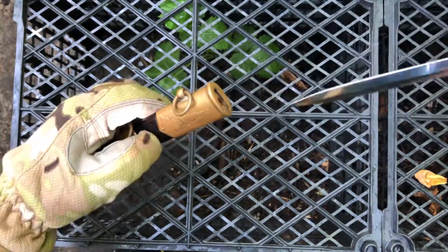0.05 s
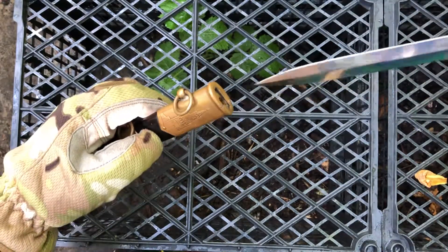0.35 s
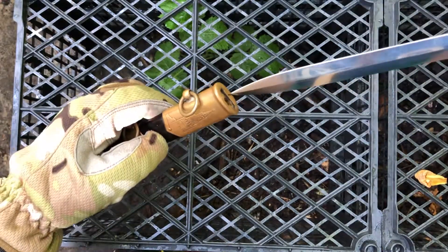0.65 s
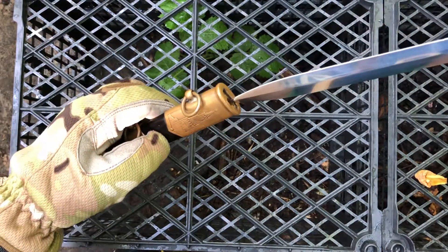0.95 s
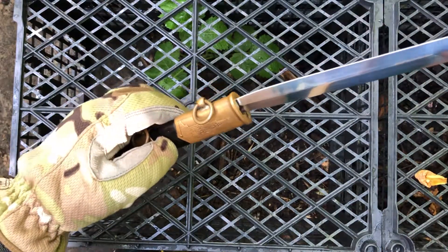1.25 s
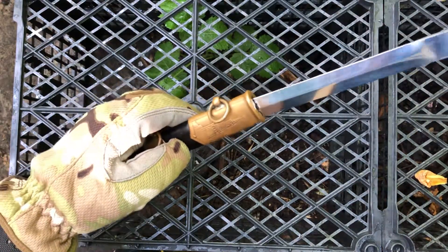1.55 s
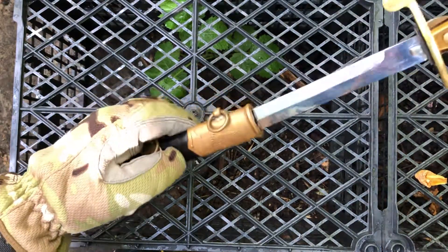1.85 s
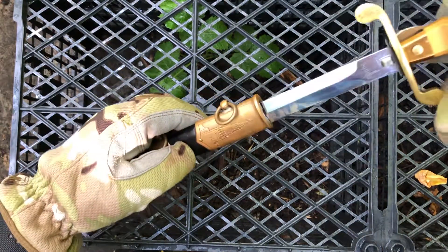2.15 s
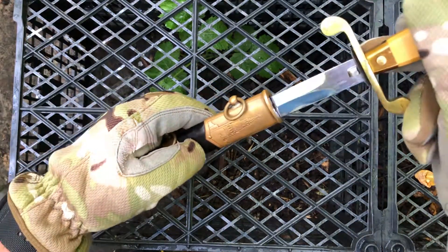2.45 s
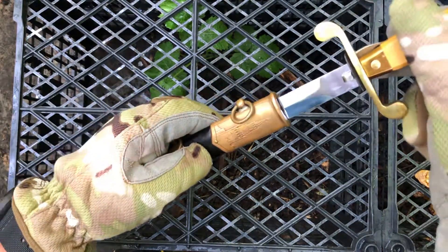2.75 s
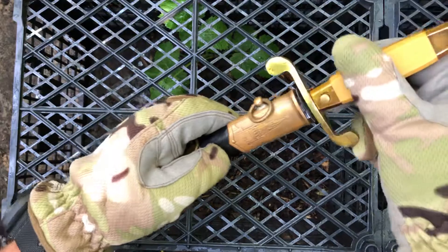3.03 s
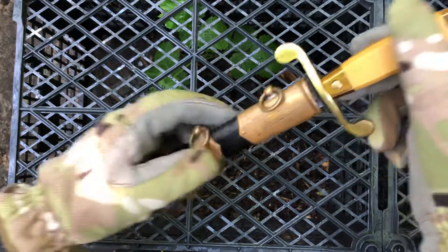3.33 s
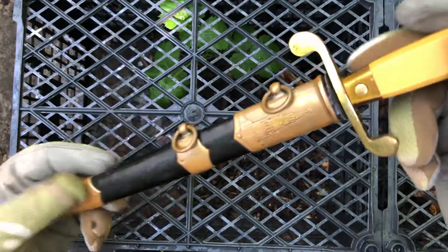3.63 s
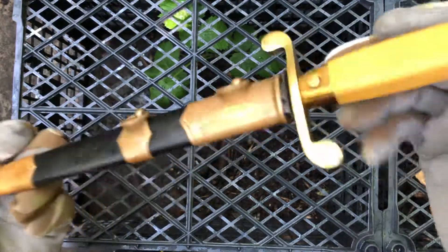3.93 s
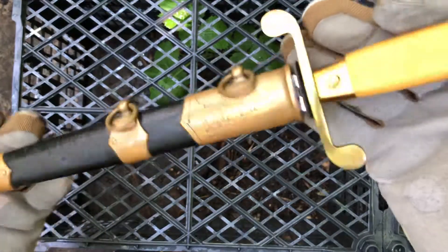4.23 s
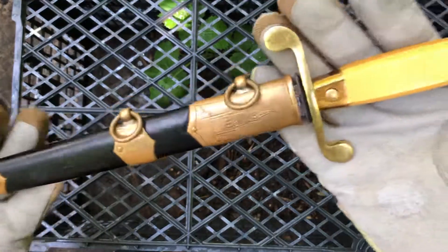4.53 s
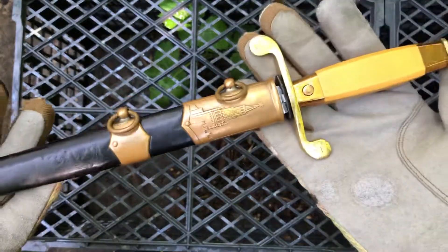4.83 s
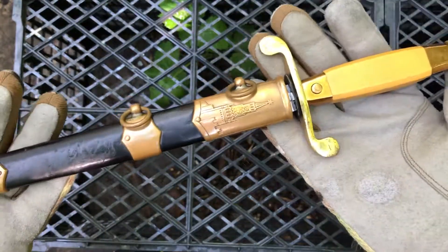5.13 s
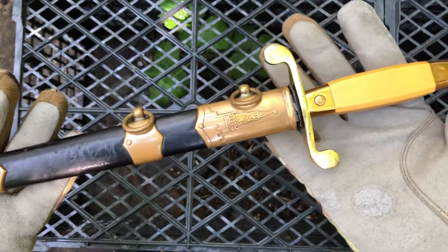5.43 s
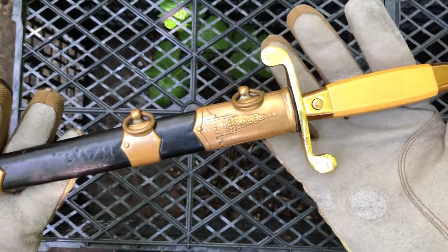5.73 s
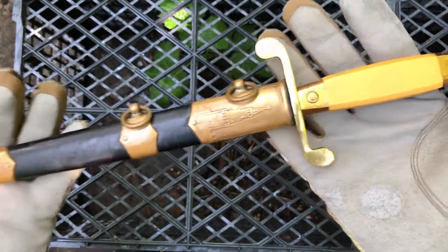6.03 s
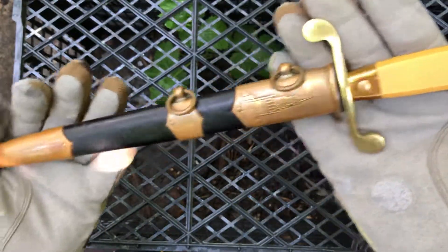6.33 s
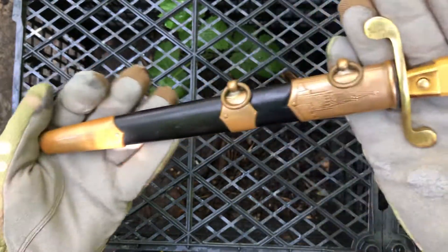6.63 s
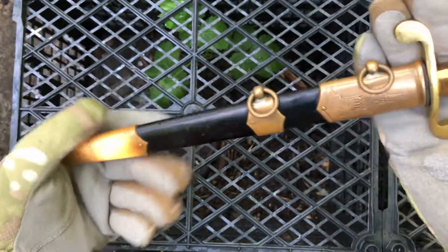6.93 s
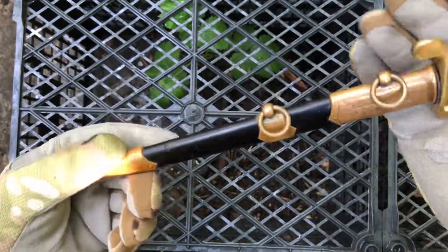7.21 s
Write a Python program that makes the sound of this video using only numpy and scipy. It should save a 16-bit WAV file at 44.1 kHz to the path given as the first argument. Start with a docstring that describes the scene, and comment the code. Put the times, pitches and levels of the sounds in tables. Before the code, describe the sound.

A steel dagger scrapes into its brass-mounted scabbard, then gloves rustle and one sharp click sounds, over a low rumble of distant traffic.

```python
"""Outdoors, close to the microphone: gloved hands sheathe a steel dagger in a brass-mounted scabbard.
A glove rustles, then the point ticks against the throat and rings. From 1.2 s the blade scrapes in,
push by push, knocking and squeaking as the lining damps it, and seats at 3 s. Gloves rub and fittings
tick as the piece is turned; at 5.6 s the hilt snaps home with one sharp click.
Distant traffic rumbles throughout, and one vehicle draws nearer in the second half."""
import sys
import numpy as np
from scipy import signal
from scipy.fft import rfft, irfft, next_fast_len
from scipy.io import wavfile
from scipy.ndimage import uniform_filter1d, map_coordinates

SR = 44100
rng = np.random.default_rng(int(sys.argv[2]) if len(sys.argv) > 2 else 0)


def master(y):
    """Save y as 16-bit WAV."""
    cut = np.clip(np.atleast_2d(y).T, -1, 1)
    pcm = np.round(cut * 32767)  # scale
    wavfile.write(sys.argv[1], SR, pcm.astype(np.int16))


N = 320607
TIME, RING_TIME = np.arange(N) / SR, np.arange(SR // 4) / SR

# modes of the blade held in the throat: f/Hz, level/dB, t60/s
STEEL_MODES = [(1500, 7, 0.032), (2070, 9.5, 0.016), (2800, -5.5, 0.044), (3350, 0.5, 0.024),
               (4180, 5.5, 0.025), (4770, 10, 0.012), (5200, 0, 0.025), (7120, 5.5, 0.03), (9160, 5, 0.012),
               (10300, 6, 0.023), (13320, -13, .025)]
# modes of the brass mounts and guard: f/Hz, level/dB, t60/s
BRASS_MODES = [(1453, 1, .028), (1780, -2, .025), (4750, 2, .035), (6293, -6, .028), (7235, -5, .03),
               (7540, -6, .03), (8213, -1, .025), (8848, 0, .033), (9093, -2, .03), (9950, -1, .027),
               (10580, -2, .024), (11550, 1, .027), (12190, -2, .027), (12505, 1, .028), (12760, -1, .025),
               (14080, -1, .02)]
# modes of the scabbard's mouth and hollow body: f/Hz, level/dB, t60/s
HOLLOW_MODES = [(1141, -25, .012), (1471, -18.5, 0.016), (2788, -2, .0065), (3020, -2, 0.0065),
                (3400, -6.5, 0.0057)]
# modes of the scabbard with the blade home: f/Hz, level/dB, t60/s
SEATED_MODES = [(1190, 4, 0.018), (2300, 0, .018), (2870, 0, .018), (3880, 5, 0.013), (4560, -5, .018),
                (5500, 1, .026), (6570, -3, .018), (7100, 5, .018)]
# only a firm blow sets the mounts ringing: blow level/dB, relative ring/dB
BRASS_RING = [(-49, -14.5), (-14, -8.5)]
# how far the blade is in: t/s, share of its length
BLADE_DEPTH = [(1.2, 0.045), (1.5, 0.18), (1.8, 0.43), (2.75, 0.62), (3.02, 1)]
# the point feels for the throat: t/s, level/dB, brightest f/Hz, point ring/dB
POINT_TAPS = [(0.731, -62, 6000, -2), (1.0245, -39, 5540, -7), (1.0453, -43.5, 6800, -3),
              (1.219, -59, 6000, 8), (1.233, -38.5, 3200, 3.5)]
# the edge knocks against the throat: t/s, level/dB, brightest f/Hz, flex f/Hz
EDGE_KNOCKS = [(0.6524, -50, 2050, 2120), (1.332, -57, 4000, 1600), (1.4602, -45.5, 2800, 1820),
               (1.466, -43.5, 5330, 1900), (1.488, -33.5, 4050, 2590), (1.8144, -27, 4700, 1960),
               (1.817, -47, 4300, 1360), (2.6134, -53, 2760, 1710)]
# pushes of the blade along the throat: t/s, length/s, level/dB
PUSHES = [(1.174, 0.16, -60.5), (1.399, .075, -60.5), (1.457, 0.17, -47), (1.768, 0.072, -61),
          (1.898, 0.19, -66.5), (2.195, .2, -62.5), (2.518, 0.18, -67), (2.857, 0.23, -64.5),
          (2.978, 0.061, -54)]
# spectrum of the edge rasping on the throat: f/Hz, level/dB
RASP_SPECTRUM = [(760, -65.5), (1300, -17), (2020, 2.5), (3110, -1), (4630, -0.5), (6690, -5), (9360, -10),
                 (10100, -13), (13000, -16), (16000, -29)]
# stick-slip squeaks: t/s, half length/s, f/Hz, level/dB
SQUEAKS = [(1.556, 0.028, 9100, -66), (1.561, .005, 1990, -56), (1.594, 0.0092, 2080, -57),
           (2.31, 0.0058, 5400, -63), (3.94, .008, 3380, -65)]
# the blade bottoms, a dull knock and then a bright one: t/s, level/dB, brightest f/Hz
SEATINGS = [(2.9957, -36.5, 2300), (3.0215, -35, 6800)]
# the guard meets the throat, later locks: t/s, level/dB, hollow knock/dB, rebound gap/s, first rebound/dB
SNAPS = [(3.022, -29, -27, 0.0062, -8.5), (5.6304, -13.5, -5, .0098, -19)]
# brass rings and mounts tick: t/s, level/dB, brightest f/Hz, colour width/octaves
TICKS = [(0.8747, -42, 7400, 0.33), (3.9577, -45, 4650, 0.78), (4.0707, -56.5, 5000, 0.56),
         (5.0145, -57.5, 8000, 4.2), (5.8585, -46, 6500, 2.7)]
# gloves drag over leather and brass: t/s, length/s, level/dB, tilt/dB per octave
GLOVE_RUBS = [(-.1, 0.48, -71, -3), (3.229, 0.18, -63, -2), (3.363, .16, -62.5, -5.5),
              (3.467, 0.45, -63, -5.5), (3.846, 0.28, -63, -7), (4.12, 0.2, -69.5, 0),
              (4.276, 0.59, -69, -4.5), (6.097, .19, -66.5, -6), (6.259, 0.36, -71.5, -8.5),
              (6.65, 1, -72, -5)]
# spectrum of the glove fabric: f/Hz, level/dB
CLOTH_SPECTRUM = [(940, -30), (1600, -12), (2140, -8.5), (2880, -5), (3110, -3), (8550, 1), (11900, -1),
                  (15100, -4), (16000, -14.5)]
# decay of the yard's reflections: f/Hz, t60/s
YARD_DECAY = [(300, .2), (3000, 0.2), (8000, 0.26), (15000, .21)]
# spectrum of distant traffic: f/Hz, level/dB
TRAFFIC_SPECTRUM = [(13, -55.5), (22, -21.5), (25, -13), (35, -4.5), (59, -1), (96, -6), (114, -11.5),
                    (163, -7), (189, -11.5), (246, -12.5), (395, -19.5), (598, -27), (708, -25), (995, -27),
                    (2000, -44), (2600, -71.5), (4400, -120)]
# spectrum of the vehicle drawing nearer: f/Hz, level/dB
VEHICLE_SPECTRUM = [(20, -92.5), (45, -18), (72, 8.5), (90, 0.5), (105, -14.5), (125, 2.5), (220, -22.5),
                    (500, -40.5), (1500, -120)]
# that vehicle's uneven rise: t/s, level/dB
VEHICLE_LEVEL = [(0, -67), (3.8, -54), (4.6, -52.5), (5.8, -62.5), (6.7, -49.5), (7.27, -54)]
# a far engine swells and sinks: t/s, level/dB
DRONE_LEVEL = [(0, -61), (1.2, -55), (2.3, -50.5), (3.6, -62.5), (4.3, -66), (7.27, -66)]
# spectrum of the open air's hiss: f/Hz, level/dB
AIR_SPECTRUM = [(880, -39), (1500, -6.5), (1960, -10.5), (3450, -12), (3840, -12.5), (4370, -13),
                (12600, -20), (14800, -23.5), (16000, -37)]

POINT_HZ, POINT_T60 = 7250, 0.062  # the point's own note


def scrape():
    """The edge catches and slips along the throat; deeper in, the rasp thins and the blade rings less."""
    slips = friction(per_s=2600, spread_db=1.0, hiss=1.0) * catches(per_s=100, flare_db=5.5, t60=.014)
    rasp = patchy(coloured(slips, RASP_SPECTRUM), depth_db=3.5, bins=3, frames=7)
    ringing = unit(signal.fftconvolve(slips, ring(STEEL_MODES))[:N])
    sound = rasp + amp(steel_ring_db(TIME) - 12) * ringing
    out = np.zeros(N)
    for start, length, db in PUSHES:
        tilt_db = 5.5 - 15.5 * np.exp(-depth(start + length / 2) / 0.18)  # duller at the mouth
        out += amp(db) * stroke(sound, start, length, tilt_db, skew=0.87, power=1.53)
    return out


def catches(per_s, flare_db, t60):
    """Gain of the rasp: it flares each time the edge snags, and dies back."""
    gaps = rng.uniform(.25, 1.75, N // 100) / per_s
    onsets = (np.cumsum(gaps) * SR).astype(int)
    snags = np.bincount(onsets, rng.uniform(0, 1, len(gaps)), N)[:N]
    flares = signal.fftconvolve(snags, fade(RING_TIME, t60))[:N]
    return unit(1 + amp(flare_db) * flares)


def squeaks():
    """For a moment the sliding metal locks onto one unsteady pitch."""
    phase = 2 * np.pi * np.cumsum(1 + 0.0148 * wobble(500)) / SR
    out = np.zeros(N)
    for s, half, hz, db in SQUEAKS:
        swell = np.exp(-.5 * ((TIME - s) / half) ** 2)
        out += amp(db) * np.sqrt(2) * swell * np.sin(hz * phase)
    return out


def point_taps():
    """The free point taps the throat and sings on."""
    out = np.zeros(N)
    for s, db, hz, point_db in POINT_TAPS:
        add(out, s, amp(db) * blade_blow(s, hz, 1700, point_db, octaves=1.55, t60=0.04))
    return out


def edge_knocks():
    """Knocks of the edge barely stir the point and grow drier with depth."""
    out = np.zeros(N)
    for s, db, hz, flex_hz in EDGE_KNOCKS:
        t60 = np.interp(depth(s), [0, 1], [.02, .0076])
        add(out, s, amp(db) * blade_blow(s, hz, flex_hz, point_db=-20, octaves=0.77, t60=t60))
    return out


def blade_blow(s, hz, flex_hz, point_db, octaves, t60):
    """The blade knocks, flexes at a pitch set by where it touches, and rings at the point."""
    knock = contact(STEEL_MODES, steel_ring_db(s), hz, octaves, t60, low_cut_hz=1380)
    flex_db = -4.5 - 7 * np.log2(hz / 2460)  # a duller blow bends the blade more
    flex = amp(flex_db) * blow(sine(flex_hz, t60=0.026))
    point = amp(point_db) * blow(sine(POINT_HZ, POINT_T60))
    return knock + flex + point


def depth(s):
    """Share of the blade that is inside at time s."""
    return np.clip(lookup(BLADE_DEPTH, s), 0, 1)


def steel_ring_db(s):
    """The lining damps the blade as it goes in."""
    return 1.5 - 11 * depth(s)


def seating(octaves=0.86):
    """The blade wedges home and rings the whole scabbard; a harder contact favours the higher modes."""
    out = np.zeros(N)
    attack = 1 - np.exp(-RING_TIME / 0.00081)
    for s, db, hz in SEATINGS:
        modes = [(f, level - 12 * np.log10(1 + (np.log2(f / hz) / octaves) ** 4), t60)
                 for f, level, t60 in SEATED_MODES]
        add(out, s, amp(db) * blow(ring(modes) * attack))
    return out


def snaps(rebounds=2, loss_db=5):
    """The guard strikes the throat; its rebounds are softer and longer, each weaker than the last."""
    out = np.zeros(N)
    for s, db, hollow_db, gap, rebound_db in SNAPS:
        add(out, s, brass_click(db, hz=11600, octaves=1, t60=.0055, hollow_db=hollow_db))
        for k in range(rebounds):
            level = db + rebound_db - k * loss_db
            add(out, s + (k + 1) * gap, brass_click(level, hz=8200, octaves=1, t60=0.022, hollow_db=-23))
    return out


def ticks(stirs=6, turning_s=(3.9, 7.1)):
    """The fittings tick clearly a few times; while the piece is turned, the rings stir faintly."""
    out = np.zeros(N)
    for s, db, hz, octaves in TICKS:
        add(out, s, brass_click(db, hz, octaves))
    for s in rng.uniform(*turning_s, stirs):
        add(out, s, brass_click(db=-62, hz=4800, octaves=0.74))
    return out


def brass_click(db, hz, octaves, t60=0.0078, hollow_db=-23.5):
    """A fitting clicks and knocks the hollow scabbard."""
    click = contact(BRASS_MODES, lookup(BRASS_RING, db), hz, octaves, t60, low_cut_hz=950)
    cavity = sum(amp(level) * sine(f, decay) for f, level, decay in HOLLOW_MODES)
    knock = blow(cavity * (1 - np.exp(-RING_TIME / 0.00077)))  # the cavity takes a cycle to fill
    return amp(db) * (click + amp(hollow_db) * knock)


def contact(modes, ring_db, hz, octaves, t60, low_cut_hz):
    """A crack, chatter and the part's ring; the hardness of the contact sets which octaves are bright."""
    hit = crack(t60) + amp(-12) * chatter(t60=0.03) + amp(ring_db) * blow(ring(modes))
    f = np.fft.rfftfreq(SR, 1 / SR) + 1
    band = 1 / (1 + (np.log2(f / hz) / octaves) ** 2)
    gain = band / np.sqrt(1 + (low_cut_hz / f) ** 6)
    cepstrum = irfft(np.log(gain + 1e-4))
    causal = np.exp(rfft(2 * cepstrum[:SR // 2], SR))  # minimum phase: nothing sounds before the blow
    return blow(irfft(rfft(hit, SR) * causal)[:len(hit)])


def crack(t60):
    """A burst of noise with no chance resonances of its own: the struck part supplies those."""
    burst = rfft(rng.standard_normal(len(RING_TIME)) * fade(RING_TIME, t60))
    local_power = np.abs(uniform_filter1d(np.abs(burst) ** 2, size=200))
    even = irfft(burst / np.sqrt(local_power + 1e-12), len(RING_TIME))
    return blow(even * fade(np.maximum(RING_TIME - t60, 0), t60))


def chatter(t60):
    """Loose fittings buzz against each other for a moment after a blow."""
    micro_hits = rng.standard_normal(len(RING_TIME)) * (rng.random(len(RING_TIME)) < .1)
    return blow(micro_hits * fade(RING_TIME, t60))


def ring(modes):
    """All modes of a part, at new strengths for each blow."""
    return sum(rng.choice([-1, 1]) * amp(db + 2 * rng.standard_normal()) * sine(hz, t60)
               for hz, db, t60 in modes)


def gloves():
    """Fabric drags in fine, uneven grains by the microphone; each rub starts briskly and trails off."""
    grains = friction(per_s=2300, spread_db=4.5, hiss=2.3)
    fibres = patchy(coloured(grains, CLOTH_SPECTRUM), depth_db=2.2, bins=4, frames=10)
    sound = amp(1.6 * wobble(45)) * fibres
    return sum(amp(db) * stroke(sound, start, length, tilt_db, skew=0.6, power=1.64)
               for start, length, db, tilt_db in GLOVE_RUBS)


def stroke(sound, start, length, tilt_db, skew, power):
    """A hand's speed rises and falls in an arch (skew under 1 peaks early), and friction follows."""
    progress = (TIME - start) / length
    moving = (progress > 0) & (progress < 1)
    speed = np.sin(np.pi * progress[moving] ** skew)
    octave = np.log2(np.fft.rfftfreq(len(speed)) + .01)
    tilted = irfft(rfft(sound[moving]) * amp(tilt_db * octave), len(speed))
    out = np.zeros(N)
    out[moving] = speed ** power * unit(tilted)
    return out


def friction(per_s, spread_db, hiss):
    """Tiny slips of uneven size on a smooth hiss."""
    slips = (rng.random(N) < per_s / SR) * rng.standard_normal(N)
    slips *= amp(spread_db * rng.standard_normal(N))
    return unit(unit(slips) + hiss * rng.standard_normal(N))


def patchy(x, depth_db, bins, frames):
    """Resonances come and go as the point of contact moves."""
    spectra = signal.stft(x, nperseg=256)[2]
    patches = uniform_filter1d(rng.standard_normal(spectra.shape), bins, axis=0)
    patches = unit(uniform_filter1d(patches, frames, axis=1))
    return unit(signal.istft(spectra * amp(depth_db * patches), nperseg=256)[1][:N])


def yard(x):
    """A bright scatter comes back to the microphone from the plastic grating and the ground."""
    hz, t, noise = signal.stft(rng.standard_normal(SR // 2), SR, nperseg=256)
    bright = amp(along([(3000, -3), (4500, -1), (13000, -4)], hz))[:, None]
    decay = fade(t, along(YARD_DECAY, hz)[:, None])
    tail = signal.istft(noise * bright * decay, SR, nperseg=256)[1]
    return signal.fftconvolve(x, tail / np.linalg.norm(tail))[:N]


def street():
    """Distant traffic, one engine droning in it, another drawing nearer, and a thin hiss of air."""
    rumble = amp(-48.5) * coloured(rng.standard_normal(N), TRAFFIC_SPECTRUM)
    vehicle = amp(lookup(VEHICLE_LEVEL, TIME)) * coloured(rng.standard_normal(N), VEHICLE_SPECTRUM)
    air = amp(-72 + 1.7 * wobble(9.3)) * coloured(rng.standard_normal(N), AIR_SPECTRUM)
    return rumble + drone(hz=53.23, third_db=-3) + vehicle + air


def drone(hz, third_db):
    """A far engine's wavering note with its third harmonic."""
    phase = 2 * np.pi * np.cumsum(hz * (1 + 0.02465 * wobble(5.4))) / SR
    fundamental = amp(3 * wobble(7)) * np.sin(phase)
    third = amp(third_db + 3 * wobble(7)) * np.sin(3 * phase)
    return amp(lookup(DRONE_LEVEL, TIME)) * unit(fundamental + third)


def amp(db):
    """Decibels to gain."""
    return 10 ** (np.asarray(db) / 20)


def unit(x):
    """Scale to rms 1."""
    return x / np.sqrt(np.mean(x ** 2) + 1e-20)


def blow(x):
    """Scale to the energy of two milliseconds at rms 1."""
    return x / np.linalg.norm(x) * np.sqrt(.002 * SR)


def fade(t, t60):
    """Free decay, 60 dB in t60."""
    return np.exp(-np.log(1000) * t / t60)


def sine(hz, t60):
    """One struck mode."""
    return np.sin(2 * np.pi * hz * RING_TIME) * fade(RING_TIME, t60)


def lookup(rows, x):
    """Read (x, value) rows on a linear axis."""
    return np.interp(x, *np.transpose(rows))


def along(rows, hz):
    """Read (f/Hz, value) rows on a log axis."""
    f, values = np.transpose(rows)
    return np.interp(np.log(hz + 1), np.log(f + 1), values)


def wobble(rate):
    """A smooth random curve, rate knots a second."""
    return map_coordinates(rng.standard_normal(int(N * rate / SR) + 4), [TIME * rate])


def filtered(x, response):
    """x times a response of frequency."""
    size = next_fast_len(N + SR // 2)
    return irfft(rfft(x, size) * response(np.fft.rfftfreq(size, 1 / SR)), size)[:N]


def coloured(x, spectrum):
    """x shaped by a spectrum, at rms 1."""
    return unit(filtered(x, lambda hz: amp(along(spectrum, hz))))


def add(track, s, sound):
    """Mix a sound in at time s."""
    part = track[round(s * SR):][:len(sound)]
    part += sound[:len(part)]


def scene():
    """Dagger and gloves close to the microphone, the yard faint around them, the street far off."""
    blade = point_taps() + edge_knocks() + scrape() + squeaks() + seating()
    metal = blade + snaps() + ticks()
    return (metal + amp(-28) * yard(metal) + gloves() + street())[None]


def record(dry):
    """One microphone sheds the deepest bass and rounds off the top octave; the band ends at 16.3 kHz."""
    low_cut = signal.butter(6, 43, "highpass", fs=SR, output="sos")
    high_cut = signal.butter(8, 14900, fs=SR, output="sos")
    sound = signal.sosfilt(high_cut, signal.sosfilt(low_cut, dry[0]))
    return filtered(sound, lambda hz: 1 / (1 + (hz / 16300) ** 120))[None]


dry = scene()
out = record(dry)
master(out)
```